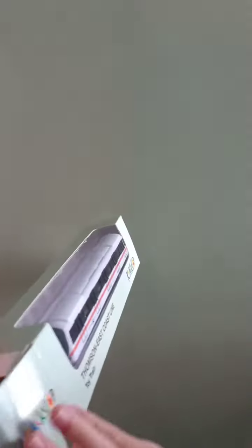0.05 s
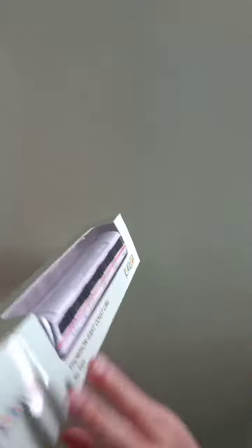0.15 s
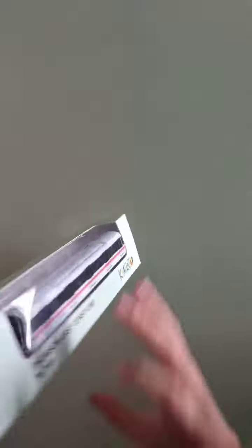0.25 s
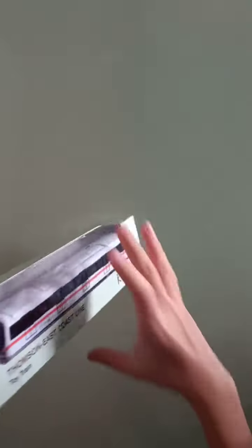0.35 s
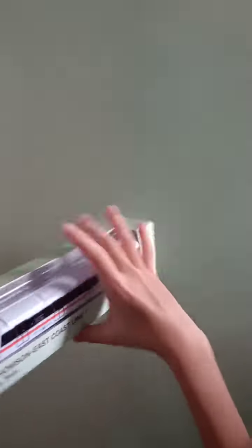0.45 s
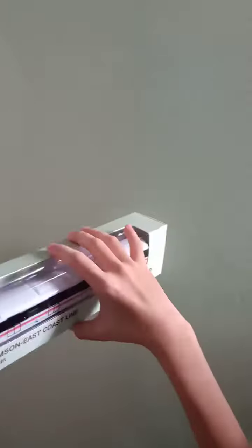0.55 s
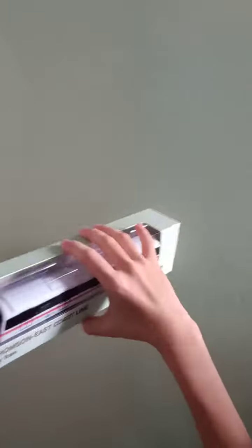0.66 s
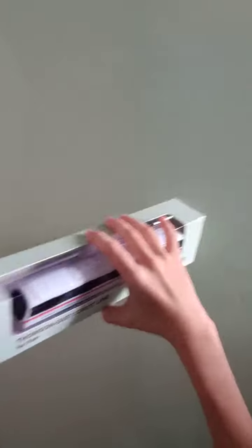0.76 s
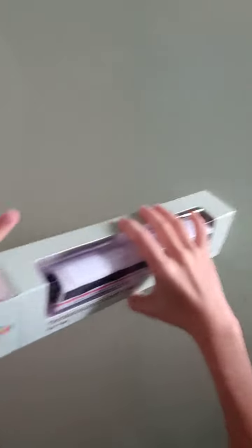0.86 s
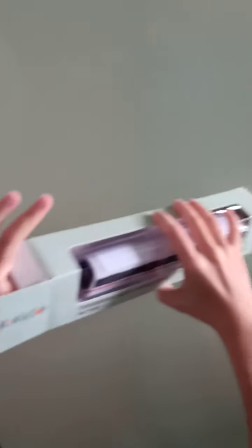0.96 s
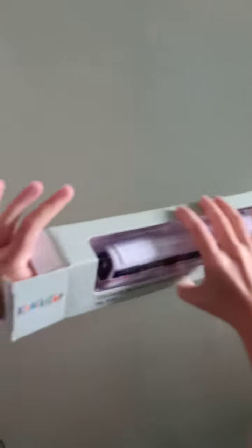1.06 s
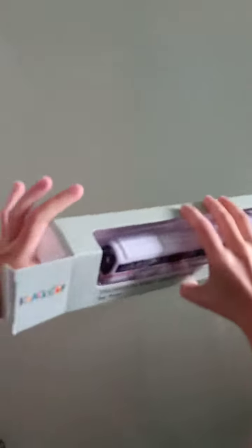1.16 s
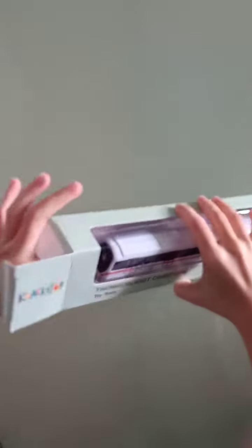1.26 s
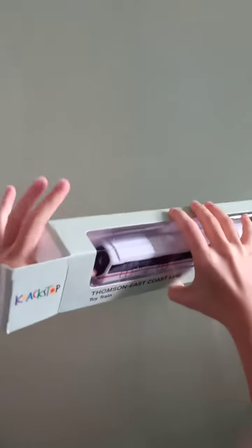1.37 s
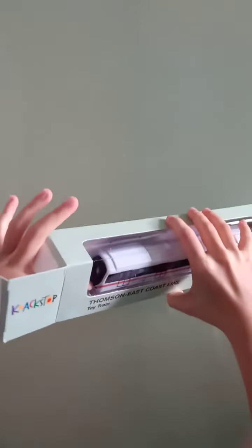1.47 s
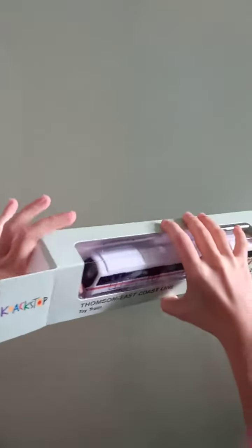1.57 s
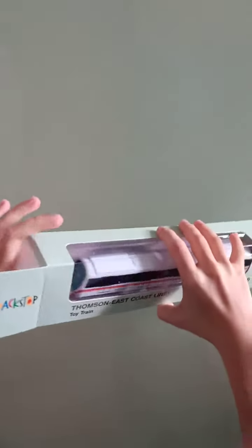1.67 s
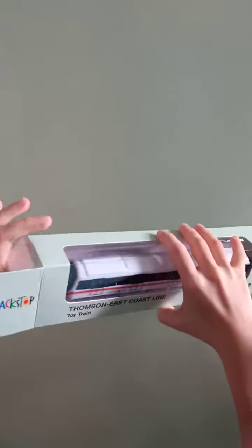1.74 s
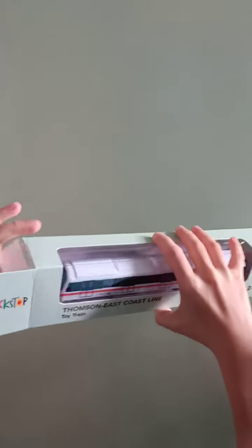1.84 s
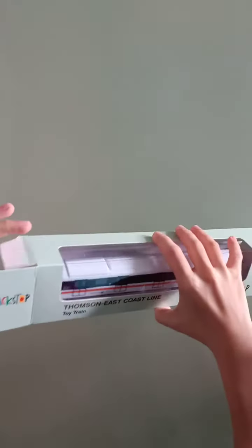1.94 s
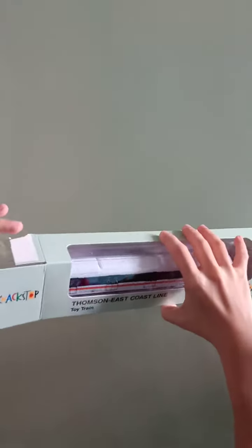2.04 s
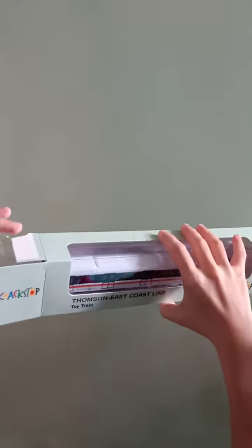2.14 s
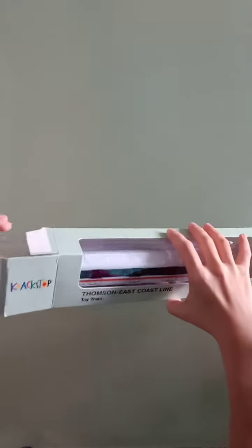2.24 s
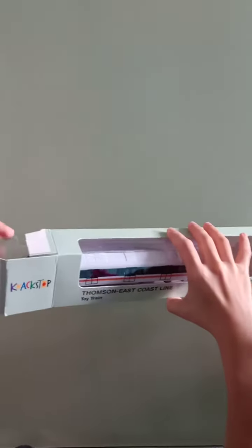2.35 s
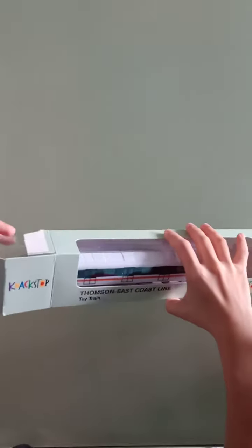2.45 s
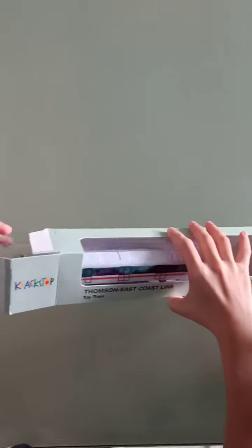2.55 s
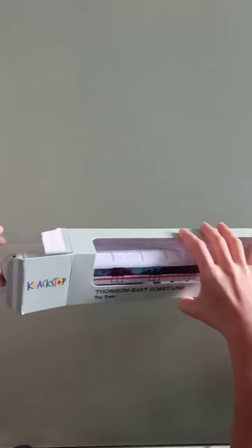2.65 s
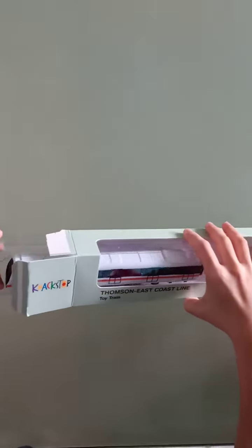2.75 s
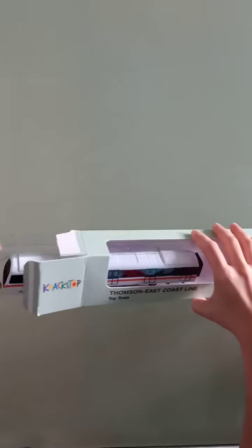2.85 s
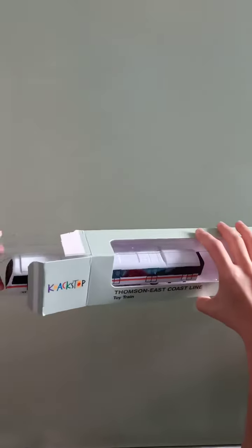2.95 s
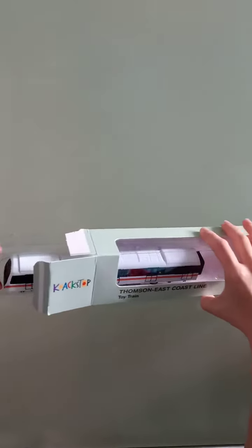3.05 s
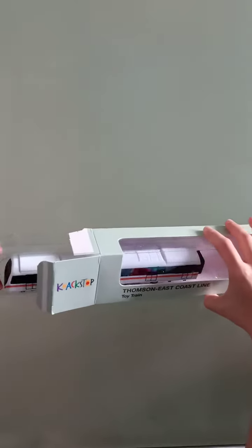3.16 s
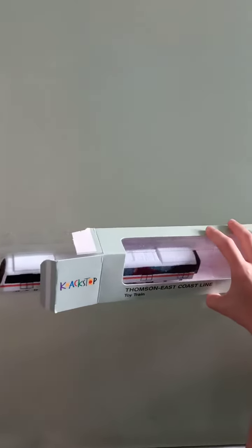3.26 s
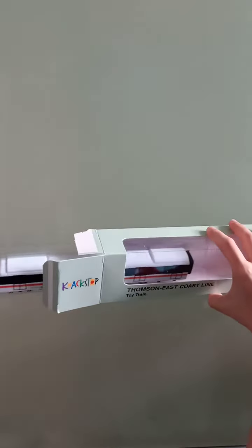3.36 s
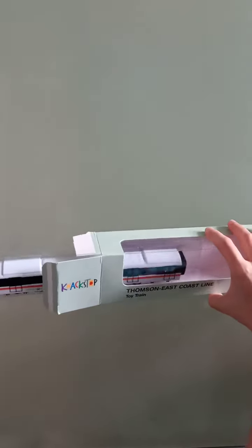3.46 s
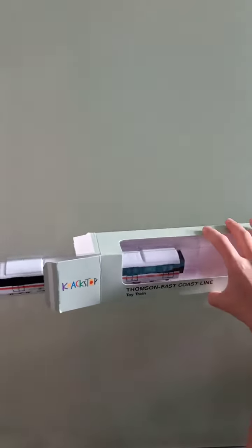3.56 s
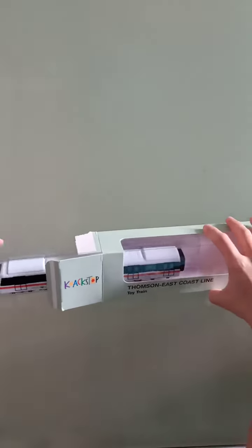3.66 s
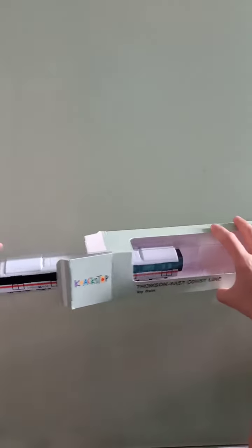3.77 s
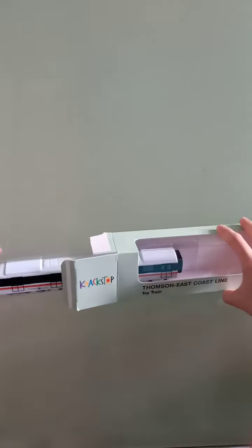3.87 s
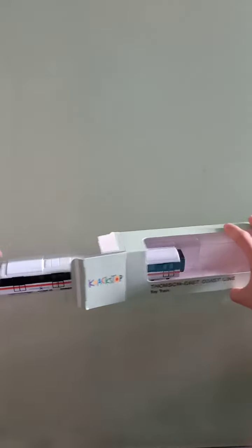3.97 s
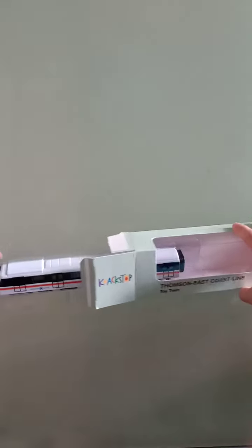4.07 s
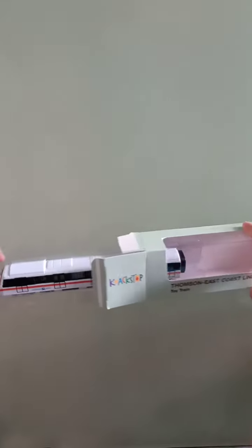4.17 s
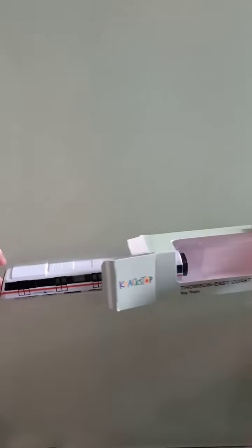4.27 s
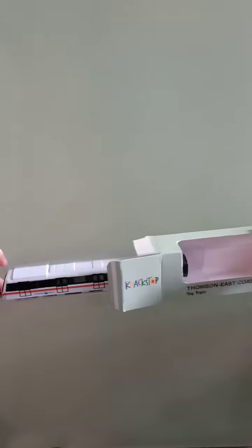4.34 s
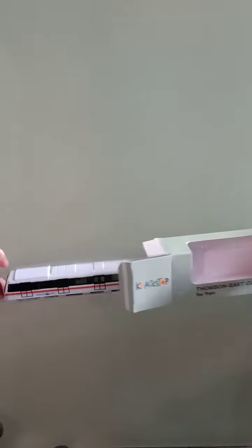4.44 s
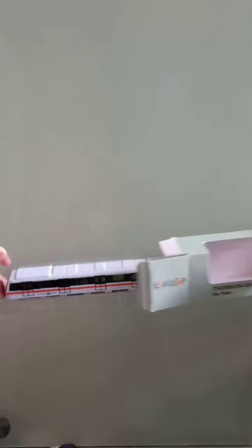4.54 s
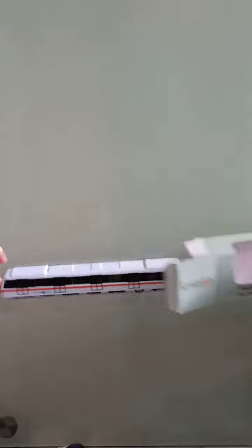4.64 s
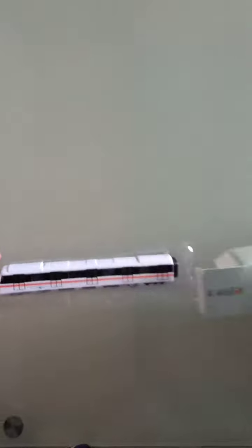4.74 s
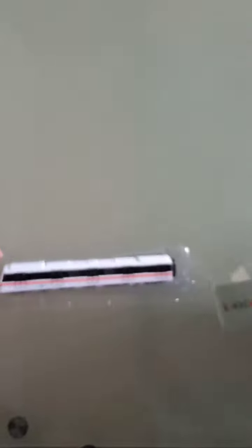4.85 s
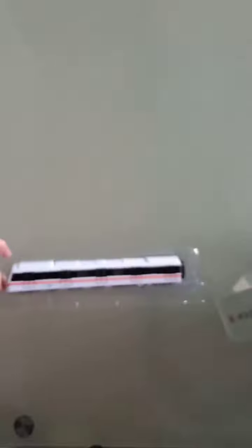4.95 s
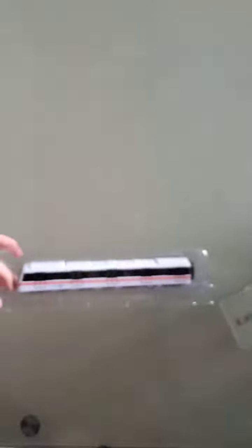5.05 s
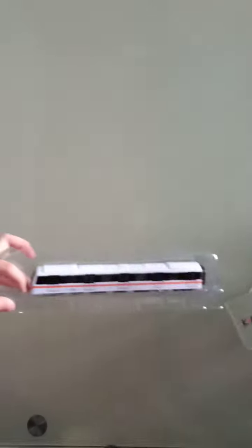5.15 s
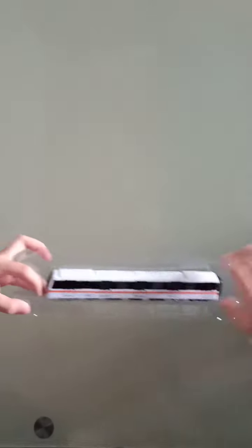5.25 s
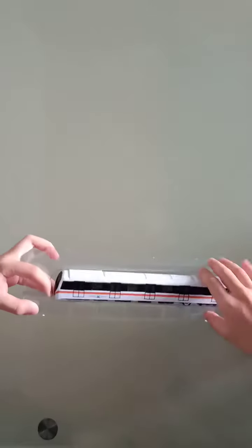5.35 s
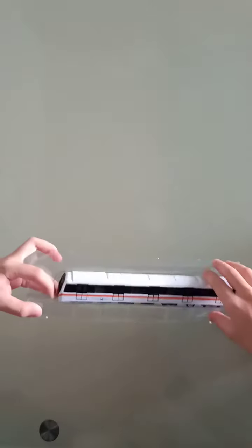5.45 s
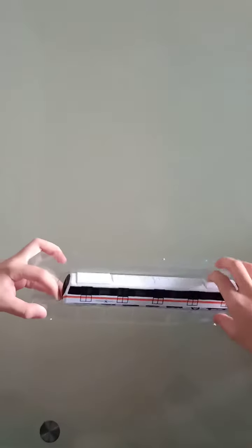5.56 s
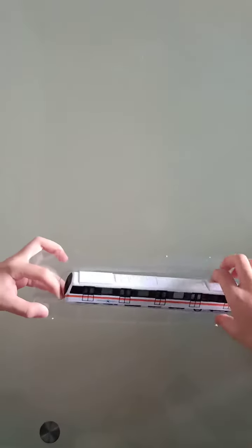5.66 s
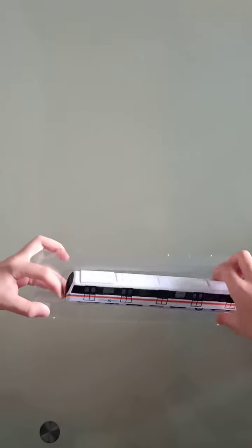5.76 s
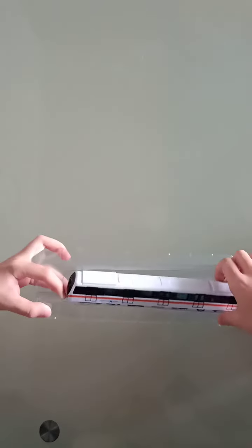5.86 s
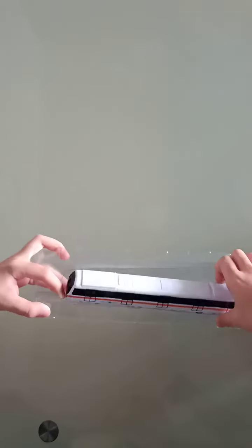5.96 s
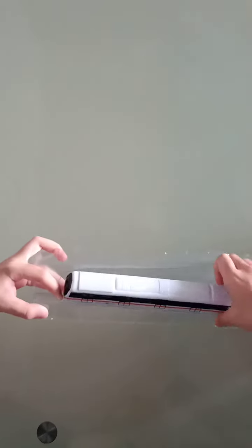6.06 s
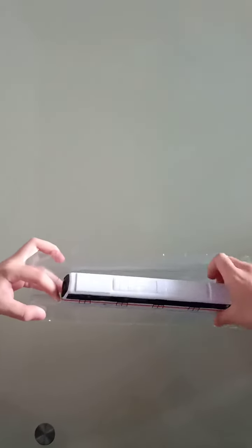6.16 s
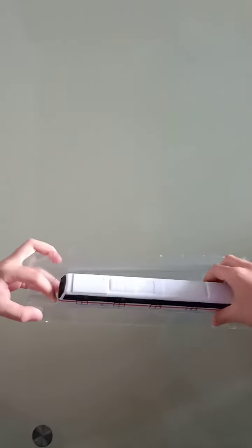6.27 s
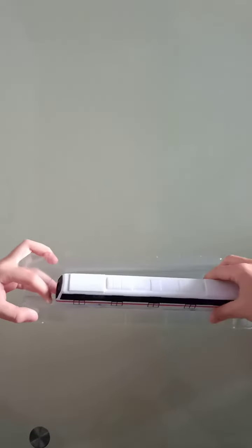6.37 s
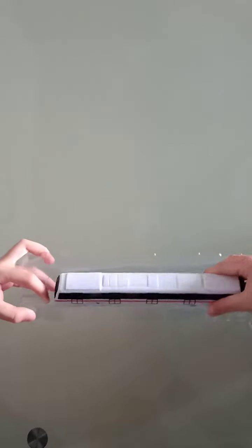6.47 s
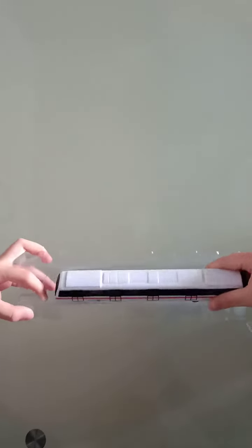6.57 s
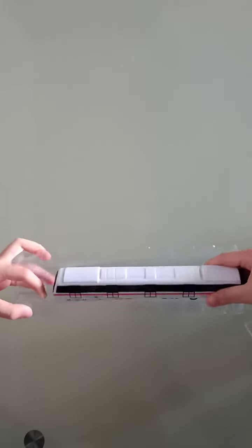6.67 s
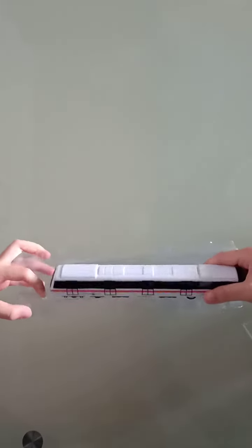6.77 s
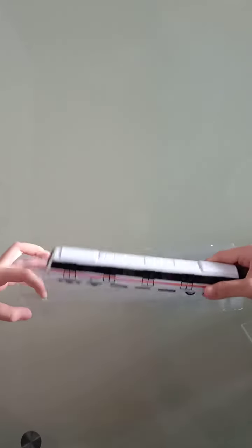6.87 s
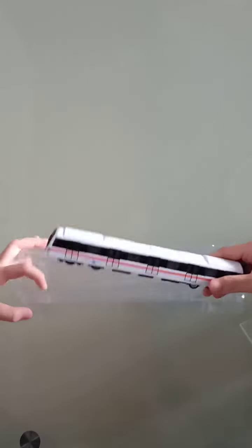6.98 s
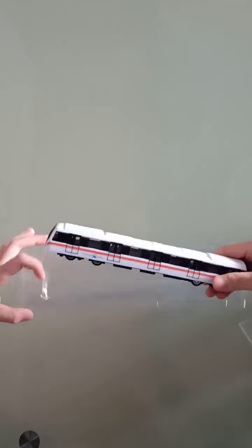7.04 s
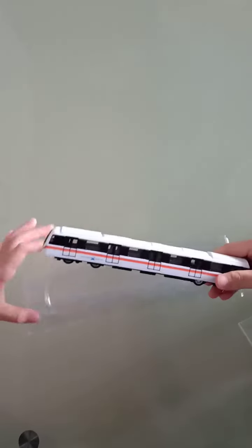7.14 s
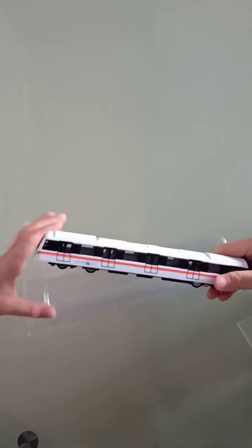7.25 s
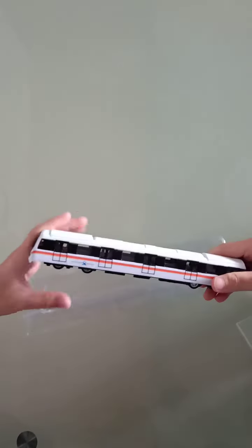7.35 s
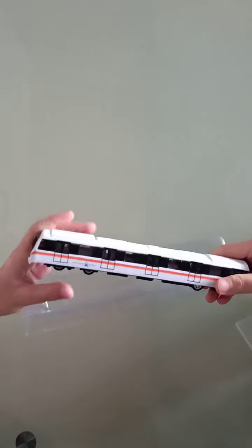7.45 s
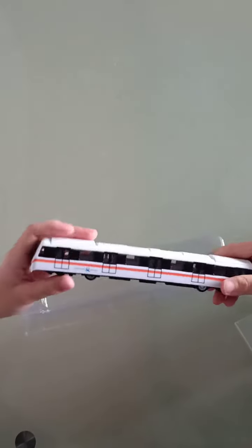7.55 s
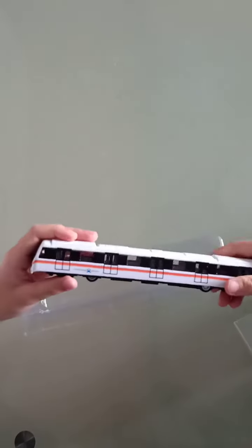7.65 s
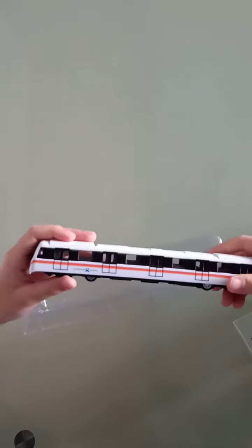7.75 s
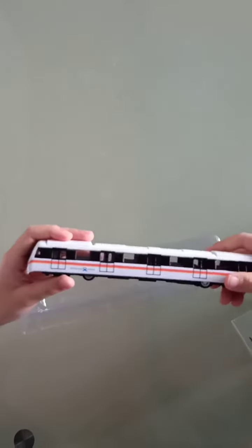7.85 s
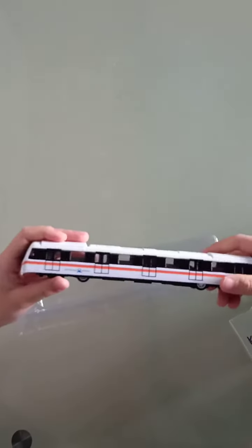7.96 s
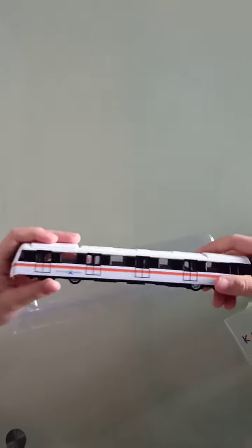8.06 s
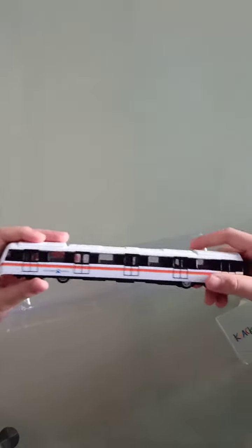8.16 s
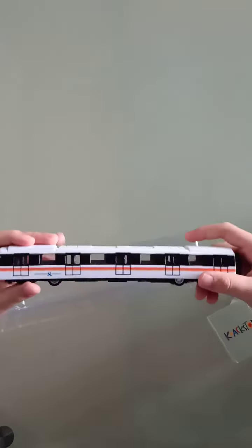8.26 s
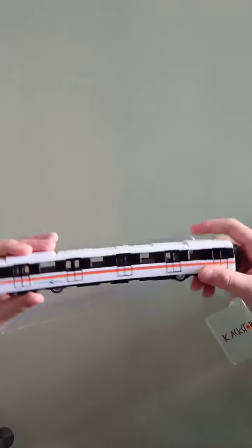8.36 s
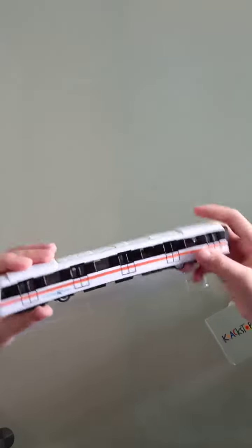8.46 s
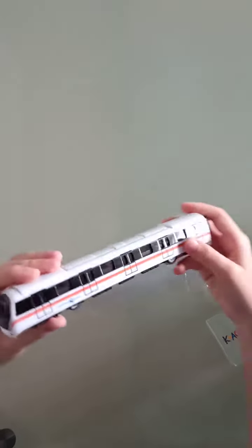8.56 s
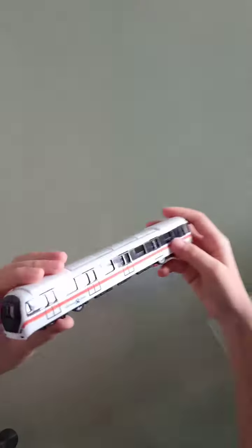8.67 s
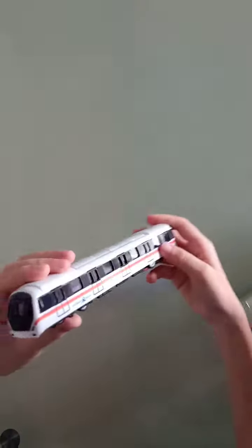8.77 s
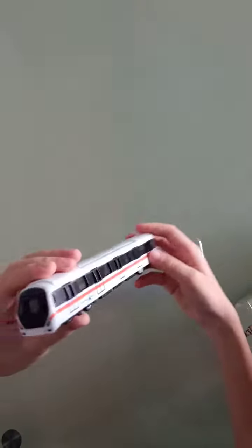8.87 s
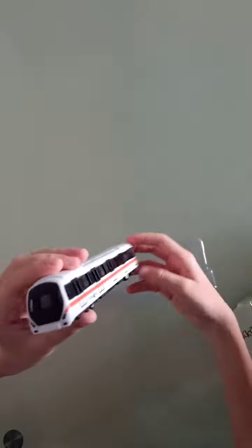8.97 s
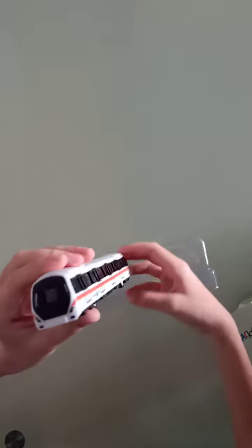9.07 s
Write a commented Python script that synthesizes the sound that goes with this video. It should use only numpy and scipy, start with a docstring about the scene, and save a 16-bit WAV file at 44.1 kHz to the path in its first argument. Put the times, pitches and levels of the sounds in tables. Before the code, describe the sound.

A plastic tray scrapes and squeaks jerkily out of a thin card box, the empty box knocks hollowly, then a toy clatters in crinkling plastic.

```python
"""Unpacking a toy train

A toy train in a clear plastic tray is pulled out of its cardboard box, close to a phone in a small room.
The flap pops and the tray scrapes and squeaks along the card: stick-slip friction, coloured by resonant panels.
The empty box is dropped on the table and its modes ring; knocks of the train and buckling of the tray are
impulses and crumpling noise through resonances. Mains hum (wavering sines) and a low rush of air (shaped noise)
lie underneath. Random reflections add the room.
"""
import sys
import numpy as np
from scipy import signal
from scipy.fft import rfft, irfft, next_fast_len
from scipy.io import wavfile
from scipy.ndimage import uniform_filter1d

SR = 44100
rng = np.random.default_rng(int(sys.argv[2]) if len(sys.argv) > 2 else 0)


def pcm_store(signal):
    """Save signal as 16-bit PCM."""
    levels = np.round(np.clip(np.atleast_2d(signal), -1, 1) * 32767)
    wavfile.write(sys.argv[1], SR, levels.astype(np.int16).T)


N = 401828

SIZE = 4096  # samples in one short sound, and in the grid of its spectrum
LEAD = SIZE // 16  # samples of strain before a snap
HZ = np.fft.rfftfreq(SIZE, 1 / SR)


def amp(db):
    """Logarithmic level: decibels become a linear gain."""
    return 10 ** (np.asarray(db) / 20)


def evened(x):
    """Power normalisation: scales to rms 1."""
    return x / np.sqrt(np.mean(x ** 2) + 1e-20)


def read(points, hz):
    """Spectral envelope: interpolates the points along a log-frequency axis."""
    f, value = np.transpose(points)
    return np.interp(np.log(hz + 1), np.log(f + 1), value)


def add(mix, s, sound):
    """Superposition: adds a sound to the mix at time s."""
    part = mix[..., max(round(s * SR), 0):][..., :sound.shape[-1]]
    part += sound[..., :part.shape[-1]]


def wander(count, rate_hz, size=16):
    """Low-passed noise: a slow chance of rms 1, drawn once every few samples and joined up."""
    steps = next_fast_len(count // size + 2, True)
    hz = np.fft.rfftfreq(steps, size / SR)
    coarse = irfft(rfft(rng.standard_normal(steps)) / (1 + np.square(hz / rate_hz) ** 2), steps)
    return evened(np.interp(np.arange(count) / size, np.arange(steps), coarse))


def colour(x, db):
    """Minimum-phase filtering: a causal body whose gain on the HZ grid is db."""
    log_gain = np.log(amp(np.maximum(np.r_[db, db[-2:0:-1]], -100)))
    ring = np.fft.ifft(np.exp(np.conj(signal.hilbert(log_gain)))).real
    return signal.oaconvolve(np.atleast_2d(x), ring[None], axes=1)[:, :x.shape[-1]]


def lift(hz, width_hz, db):
    """Resonance curve: gain in dB of one mode standing out of a flat response."""
    return 10 * np.log10(1 + (amp(db) ** 2 - 1) / (1 + (2 * (HZ - hz) / width_hz) ** 2))


def above(edge_hz):
    """High-pass weighting: a soft step from 0 to 1 around a frequency."""
    return 1 - 1 / (1 + (HZ / edge_hz) ** 6)


def resonate(x, hz, width_hz):
    """Heterodyne resonance: shifts the curve hz to zero, low-passes, and shifts back."""
    turn = np.exp(2j * np.pi * np.cumsum(hz) / SR)
    r = np.exp(-np.pi * width_hz / SR)
    return 2 * (turn * signal.lfilter([1 - r], [1, -r], x / turn)).real


def smooth_push(push, size=45):
    """Spectral whitening: gain in dB that evens a crumple's energy, leaving the panel to colour it."""
    power = np.mean(abs(rfft(push)) ** 2, axis=0)
    return -10 * np.log10(uniform_filter1d(power, size=size) + 1e-9)


def friction(count, slips_per_s, spread_db, judder_db, judder_hz):
    """Stick-slip friction: countless tiny slips of uneven size, bunched by the judder of the hand."""
    sizes = amp(spread_db * np.minimum(rng.exponential(1, count), 3.5))
    slips = (rng.random(count) < slips_per_s / SR) * sizes
    shared = evened(slips * rng.choice([-1, 1], count))
    both = shared + 0.372 * rng.standard_normal((2, count))
    return evened(both * amp(judder_db * wander(count, judder_hz)))


# Spectrum of a thin buckling sheet. Each row: frequency in Hz, relative density in dB per Hz.
SHEET_SPECTRUM = [(100, -24), (280, -7), (440, -3), (620, -2), (800, 2), (1200, -2.5), (1800, 0),
                  (2700, -5.5), (3200, -11.5), (3800, -11), (5300, -23), (7000, -16.5), (8200, -18),
                  (11000, -24.5), (15500, -28.5)]
# Resonances of stiff creases. Each row: mean frequency in Hz, width in Hz, lift in dB.
CREASE_RESONANCES = [(8130, 3440, 6.5), (11600, 750, 4.5)]


def snap(hz, ring_db, crack_db, thump_db, crumple):
    """Snap-through buckling: a panel strains, flips with a click, crumples briefly and rings at its pitch."""
    t = (np.arange(SIZE) - LEAD) / SR
    shared, *own = rng.standard_normal((3, SIZE))
    strain = amp(-25.0) * np.exp(-abs(t) / 0.006)
    collapse = np.exp(-abs(t / max(1.243 * crumple, 1 / SR)) ** 0.895)
    creases = (shared + 0.407 * np.array(own)) * np.where(t < 0, strain, collapse)
    push = 0.878 * creases / np.linalg.norm(creases[0]) + 0.511 * (t == 0)
    body_db = read(SHEET_SPECTRUM, HZ) + lift(hz, 0.1142 * hz, ring_db) + thump_db * (1 - above(933))
    # a sharp snap brightens the sheet a little and its stiff creases most
    body_db = body_db + crack_db * (.5 * above(2386) + .5 * above(5110)) - 3 * above(3860)
    for crease_hz, width_hz, lift_db in CREASE_RESONANCES:
        body_db = body_db + lift(crease_hz * (1 + 0.0184 * rng.standard_normal()), width_hz, lift_db)
    return amp(14.5) * colour(push, body_db + smooth_push(push))


# Spectrum of the air. Each row: frequency in Hz, relative density in dB per Hz.
AIR_SPECTRUM = [(25, -27.5), (45, -22.5), (65, -10), (82, -16), (112, -17.5), (135, 1), (175, -10),
                (207, -3.5), (260, -9.5), (480, -9), (900, -16.5), (1500, -19), (2500, -17.5), (3300, -28),
                (5500, -34), (7500, -30), (15500, -43)]
# Coherence of the air. Each row: frequency in Hz, left-right likeness as a fraction.
AIR_LIKENESS = [(30, 0.23), (100, 1), (300, 0.789), (700, 0.185), (1500, 0.021), (5000, 0.027)]
# Mains hum. Each row: frequency in Hz, rms level in dB, waver as relative swing and as phase in radians.
HUM_PARTIALS = [(99.57, -53.5, 0.149), (148.52, -57, 0.207), (250.5, -66, 0.45), (310.1, -62, 0.626),
                (353.1, -66, 0.081), (552.9, -64.5, 0.465)]
AIR_DB = -52  # level of the two ports' average above 200 Hz


def background():
    """Partially coherent noise and modulated partials: a rush of air, alike in the bass, and wavering hum."""
    hz, t = np.fft.rfftfreq(N, 1 / SR), np.arange(N) / SR
    a, b = rfft(rng.standard_normal((2, N)))
    same = np.clip(read(AIR_LIKENESS, hz), -1, 1)
    z = np.array([a, same * a + np.sqrt(1 - same ** 2) * b]) * amp(read(AIR_SPECTRUM, hz))
    air = irfft(z, N) / np.std(irfft(z.mean(0) * (hz > 200), N))
    hum = np.zeros(N)
    for f, db, waver in HUM_PARTIALS:
        swing = 1 + waver * wander(N, 4.8)
        hum += amp(db) * evened(swing * np.sin(2 * np.pi * f * t + waver * wander(N, 5.95)))
    return amp(AIR_DB) * air + hum


# Shifts of the fingers' hold. Each row: start in seconds, end in seconds, mean ticks per second,
# typical relative level in dB.
FIDGET_SPELLS = [(0, 1.15, 8, -34.5), (1.451, 1.7, 7.3, -30.5), (5.598, 7.1, 5.5, -38),
                 (8.001, 9.1, 11, -38.5)]
FIDGET_HZ, FIDGET_SPREAD, FIDGET_SPREAD_DB = 2000, 0.344, 2.5  # usual pitch, its relative scatter, level scatter
FIDGET_RING_DB, FIDGET_CRACK_DB, FIDGET_THUMP_DB = 5, 4, -6.5
FIDGET_CRUMPLE = 0.00297  # nominal crumple time of each tick, s


def fidgets(count=24):
    """Random point process: faint ticks at uneven gaps, each from another patch of the packaging."""
    out = np.zeros((2, N))
    for start, end, rate, db in FIDGET_SPELLS:
        times = start + np.cumsum(rng.uniform(.2, 1.8, count)) / rate
        for s, (pitch, strength) in zip(times, rng.standard_normal((count, 2))):
            if s < end:
                hz = FIDGET_HZ * np.exp(FIDGET_SPREAD * pitch)
                tick = snap(hz, FIDGET_RING_DB, FIDGET_CRACK_DB, FIDGET_THUMP_DB, FIDGET_CRUMPLE)
                add(out, s - 0, amp(db + FIDGET_SPREAD_DB * strength) * tick)
    return out


# Snaps of card and plastic. Each row: time in seconds, relative level in dB, panel pitch in Hz,
# panel ring in dB, crack in dB, thump in dB, nominal crumple time in seconds.
PANEL_SNAPS = [ (.1434, -23, 3820, 8.5, 10, -1, 0.00081), (0.1786, -28.5, 2127, 22.5, 20, 6, 0.00091),
               (.253, -22.5, 1002, 14, 6, 9, 0.0054), (.542, -28, 1304, 12.5, 9, -12.5, 0.0022),
               (.578, -20.5, 1130, 2, 2, 4, 0.0048), (1.198, -9, 1150, 14, 7, -3, 0.00088),
               (1.1986, -16, 2093, 16, -15, -2, 0.0013), (1.2, -13, 653, 19.5, -11, -8.5, 0.00041),
               (1.2314, -27, 2200, 10.5, 15.5, 4, 0.00125), (1.254, -22.5, 1200, 15, 9, 7.5, 0.00187),
               (1.2669, -27.5, 1100, 5.5, 7.5, 2.5, .002), (1.399, -20.5, 1100, 7, -3, -3.5, 0.0188),
               (2.3108, -9, 4210, 8.5, 11, 0, 0.00153), (2.3114, -18, 1450, 5.5, 4, -8.5, 0.0025),
               (2.724, -19.5, 1500, 2.5, 12, 7, 0.0012), (4.4216, -21.5, 1885, 13.5, 11.5, -1.5, 0.002193),
               (4.646, -17, 999, 23, -14, -9.5, 0.00555), (4.7105, -19.5, 648, 17.5, -6.5, 5, 0.00307),
               (4.7134, -15, 2734, 13.5, 0.5, 5.5, 0.00153), (4.7218, -15.5, 9250, 10, 6.5, -0.5, 0.00205),
               (4.724, -18.5, 632, 13, 0.5, 9, 0.0055), (4.7299, -22.5, 423, 17, -7, 3.5, .004),
               (6.4968, -5, 1790, 10.5, 2, -7.5, 0.00324), (6.841, -8.5, 1604, 10.5, 2, -14.5, 0.00174),
               (7.0105, -30.5, 2000, -4.5, 8, 6, .002), (7.1703, -6.5, 3736, 27.5, -23, -18, 0.0015),
               (7.2634, -3.5, 709, 15.5, -28.5, -14, 0.0018), (7.2664, -17, 7870, 15.5, -2, -4.5, 0.0008)]
# Catches of the tray's edge on the card. Each row: time in seconds, relative level in dB.
EDGE_CATCHES = [(1.717, -20), (1.765, -15), (1.815, -22), (1.834, -25), (1.854, -28.5), (1.921, -23.5),
                (1.94, -17), (1.958, -15.5), (1.969, -15.5), (2.1709, -15), (2.21, -17.5), (2.544, -14.5),
                (2.615, -23), (2.648, -18), (2.975, -21), (3.043, -21), (3.076, -17.5), (3.357, -27),
                (3.656, -25.5), (3.742, -21.5), (3.944, -22), (4.01, -24.5)]


def snaps():
    """Buckling instability: flaps and walls each ring their own way; the catching edge ticks dully."""
    out = np.zeros((2, N))
    for s, db, *panel in PANEL_SNAPS:
        add(out, s - LEAD / SR, amp(db) * snap(*panel))
    for s, db in EDGE_CATCHES:
        tick = snap(hz=1500, ring_db=4, crack_db=-11.5, thump_db=-6.5, crumple=0.00099)
        add(out, s - LEAD / SR, amp(db) * tick)
    return out


# Skin, flaps and tray edges brushing the packaging. Each row: start in seconds, length in seconds,
# relative level in dB, ring pitch in Hz, ring lift in dB.
BRUSH_STROKES = [(0.195, 0.106, -53, 2130, -2), (0.311, 0.285, -60.5, 1530, 5.5),
                 (0.639, 0.111, -50, 2200, -6), (0.801, 0.146, -50.5, 2160, 6),
                 (0.986, 0.0955, -54, 1830, 7.5), (1.496, 0.15, -54, 681, 13),
                 (4.62, 0.1886, -36.5, 2710, 10.5), (4.691, .14, -38.5, 3690, 12),
                 (5.297, 0.087, -52, 2200, 4), (5.717, 0.18, -60.5, 2800, 11),
                 (6.538, 0.43, -54.5, 1900, 7.5), (6.979, 0.0715, -52, 2000, -12.5),
                 (8.02, 0.15, -64.5, 8200, 22.5), (8.171, 0.041, -57, 2740, 20),
                 (8.5, 0.0856, -57.5, 1650, 10.5), (8.547, 0.52, -64.5, 7600, 5)]
# a light stroke, its grain rate, extra level that doubles the rate
LIGHT_TOUCH_DB, GRAINS_PER_S, GRAIN_DOUBLING_DB = -55, 1100, 11


def brushes():
    """Granular friction: strokes sound the patch they touch, and harder ones crackle more densely."""
    out = np.zeros((2, N))
    for s, length, db, hz, ring_db in BRUSH_STROKES:
        rate = GRAINS_PER_S * 2 ** ((db - LIGHT_TOUCH_DB) / GRAIN_DOUBLING_DB)
        touch = friction(SR, slips_per_s=rate, spread_db=3.0, judder_db=3.5, judder_hz=120)
        touch = touch[:, :int(length * SR)]
        patch_db = read(SHEET_SPECTRUM, HZ) + 4 * above(6900) + lift(hz, 0.142 * hz, ring_db)
        stroke = evened(colour(touch, patch_db))
        add(out, s, amp(db) * stroke * np.hanning(stroke.shape[1]))
    return out


# Pulls of the tray. Each row: start in seconds, length in seconds, rise in seconds, relative scrape level
# in dB, change while held in dB, depth of the jerks in dB, then edge fizz, box boom and loose grit in dB
# relative to the scrape, pitch of the singing panel in Hz and its level in dB relative to the scrape.
TRAY_PULLS = [(1.703, 0.0486, 0.0056, -43, -2, 4, -12.5, -16, -13, 2000, -14.5),
              (1.755, 0.1294, 0.0343, -34.5, -5, 5.5, -18, -20, -8.5, 2040, -4),
              (1.972, 0.1655, 0.0742, -24, -10.5, 4, -17.5, -25, -11, 1220, -12.5),
              (2.211, 0.127, 0.0214, -34.5, 3.5, 6, -16.5, -14, -12, 1500, -2),
              (2.55, 0.2617, 0.0683, -33.5, -3.5, 4, -16, -10, -12, 1467, -5),
              (2.813, 0.1417, 0.0519, -33.5, -.5, 6.5, -19.5, -13, -11.5, 1125, -16.5),
              (3.072, .1, 0.004026, -36.5, 1.5, 18.5, -20, -14.5, -16.5, 1457, -7),
              (3.201, 0.2896, 0.04274, -34.5, -1, 12.5, -18.5, -13.5, -16, 1868, -6.5),
              (3.744, .15, .07, -35, -3, 9, -17.5, -12.5, -12, 1870, -4.5),
              (3.938, 0.282, 0.0675, -36, -1, 5.5, -19, -12.5, -15, 1374, -20.5),
              (4.219, 0.181, 0.0823, -38, -1, 3.5, -18, -8.5, -14.5, 900.7, -11),
              (4.395, 0.211, 0.024, -38, 2, -1, -18, -8.5, -11.5, 1920, -21),
              (4.601, 0.1817, 0.0373, -35, -5.5, 4, -11, -8.5, -6.5, 1052, -15.5)]
START_DB, RELEASE_DB_PER_S = -12, 291.5  # a pull starts this far under its full level; how fast it stops


def pulling():
    """Amplitude envelope: pulls swell, hold and stop; the strongest at any moment sets level and timbre."""
    t = np.arange(N) / SR
    levels, timbres = [], []
    for s, length, rise, db, change_db, *timbre in TRAY_PULLS:
        swell_db = START_DB * np.clip(1 - (t - s) / rise, 0, 1)
        hold_db = change_db * np.clip((t - s - rise) / (length - rise), 0, 1)
        release_db = -RELEASE_DB_PER_S * np.maximum(t - s - length, 0)
        levels.append(np.where(t < s, -np.inf, db + swell_db + hold_db + release_db))
        timbres.append(timbre)
    return np.max(levels, 0), *np.array(timbres)[np.argmax(levels, 0)].T


def gripping():
    """Mode locking: how far the slips are locked into a strong squeak, from 0 to 1."""
    t = np.arange(N) / SR
    locked = sum((t > s) & (t < s + length) for s, length, *_, db, _ in SQUEAK_TONES if db > EASY_PULL_DB)
    return uniform_filter1d(np.minimum(locked, 1.), size=400)


# slow dragging breaks up into separate jerks; harder pulls make them quicker:
# an easy pull, its jerk rate, extra level that doubles the rate
EASY_PULL_DB, JERKS_PER_S, JERK_DOUBLING_DB = -35.5, 140, 13.5
JERK_SPREAD_DB = 2.0  # no two jerks are equally strong


def jerks(level_db, jerk_db):
    """Relaxation oscillation: each jerk starts hard and dies away until the plastic sticks again."""
    effort_db = np.maximum(level_db - EASY_PULL_DB, START_DB)
    rate = JERKS_PER_S * 2 ** (effort_db / JERK_DOUBLING_DB)
    number, cycle = np.divmod(np.cumsum(rate * np.exp(.3 * wander(N, 70))) / SR, 1)
    strength, brightness = rng.standard_normal((SR, 2))[number.astype(int)].T
    jerk = amp(JERK_SPREAD_DB * strength - jerk_db * cycle)
    return jerk / np.sqrt(uniform_filter1d(jerk ** 2, size=2000)), brightness


# Spectrum of rubbed card. Each row: frequency in Hz, relative density in dB per Hz.
CARD_SPECTRUM = [(150, -21.5), (300, -8), (450, -9.5), (650, -9.5), (850, -4.5), (1150, -3), (1600, -0.5),
                 (2000, 0), (2600, -14), (3200, -20.5), (5400, -31), (7200, -24.5), (11400, -34),
                 (15500, -42.5)]
# Panels of the box. Each row: frequency in Hz, width in Hz, lift in dB.
BOX_PANELS = [(634.3, 52, 7.5), (1200, 88, 2), (3876, 170, 4.5), (7270, 580, 2), (11560, 330, 3.5)]
# Loose grains under the tray. Each row: frequency in Hz, relative density in dB per Hz.
GRIT_SPECTRUM = [(150, -32), (500, -10), (800, -1), (1500, 0), (2200, -0.5), (3000, -5), (4000, -12.5),
                 (5200, -29.5), (7500, -19.5), (15500, -35)]
GRIT_PER_S = 260  # how often a grain is crushed
JERK_TILT_DB, JERK_PIVOT_HZ = 2.5, 1500  # some jerks are dull, some bright, tilted about this pitch
GRIP_DB = -4  # the rasp and all that goes with it sink while the plastic grips and squeaks


def scrape():
    """Driven resonance under stick-slip: panels rasp, grit crackles, the edge fizzes, the hollow box booms."""
    level_db, jerk_db, fizz_db, boom_db, grit_db, contact_hz, contact_db = pulling()
    jerk, brightness = jerks(level_db, jerk_db)
    slips = jerk * friction(N, slips_per_s=3200, spread_db=1.0, judder_db=-0.66, judder_hz=111)
    card_db = read(CARD_SPECTRUM, HZ) + sum(lift(*panel) for panel in BOX_PANELS)
    bands = above(638) * (1 - above(3900)), above(3726), above(180.5) * (1 - above(766))
    rasp, fizz, boom = (evened(colour(slips, card_db + 20 * np.log10(band + 1e-9))) for band in bands)
    low_pass = signal.butter(4, JERK_PIVOT_HZ, fs=SR, output="sos")
    dull = signal.sosfiltfilt(low_pass, rasp)
    tilt = amp(JERK_TILT_DB * uniform_filter1d(brightness, size=60))
    rasp = evened(dull / tilt + (rasp - dull) * tilt)
    contact_hz = contact_hz * np.exp(0.046 * wander(N, 11.4))  # the point of contact shifts as the tray moves
    stray_hz = 1450 * np.exp(0.259 * wander(N, 11.17))  # other patches of card sing in passing
    contact = amp(contact_db) * evened(resonate(rasp, contact_hz, 96))
    rasp = evened(rasp + contact + resonate(rasp, stray_hz, 232))
    crushing = friction(N, slips_per_s=GRIT_PER_S, spread_db=1.5, judder_db=0.5, judder_hz=45)
    grit = evened(colour(crushing, read(GRIT_SPECTRUM, HZ)))
    layers = rasp + amp(grit_db) * grit + amp(fizz_db) * fizz + amp(boom_db) * boom
    return amp(level_db + GRIP_DB * gripping() - 1.85) * layers


# A hard drag makes one panel groan. Each row: start in seconds, length in seconds, start pitch in Hz,
# end pitch in Hz, relative level in dB.
PANEL_GROANS = [(2.01, 0.056, 1182, 1240, -29.5), (2.027, 0.111, 1673, 1600, -36.5),
                (2.215, 0.12, 1580, 1463, -35), (2.595, 0.0725, 1600, 1534, -29.5),
                (2.66, 0.062, 1543, 1500, -35), (3.244, 0.071, 1870, 1920, -40.5),
                (4.63, 0.068, 1833, 1710, -35)]
GROAN_WIDTH_HZ = 98  # first resonance; the second is twice as wide


def groans():
    """Narrow-band noise: slips half lock onto one panel in a rough, gliding tone that swells and fades."""
    out = np.zeros((2, N))
    for s, length, start_hz, end_hz, db in PANEL_GROANS:
        count = int(length * SR)
        hz = np.linspace(start_hz, end_hz, count)
        narrow = resonate(rng.standard_normal(count), hz, GROAN_WIDTH_HZ)
        tone = resonate(narrow, hz, 2 * GROAN_WIDTH_HZ)
        add(out, s, amp(db - 6.5) * evened(tone * np.hanning(count)))
    return out


# Squeaks of plastic sticking and slipping on card, and of a finger rubbing. Each row: start in seconds, #
# length in seconds, start pitch in Hz, end pitch in Hz, relative level in dB, octave in dB relative to the
# fundamental.
SQUEAK_TONES = [(3.19, 0.0153, 1829, 1764, -30, -17.5), (3.204, 0.0133, 1747, 1580, -39, -7),
                (3.224, 0.025, 1807, 1858, -28, -17.5), (7.025, 0.055, 880.7, 891, -48.5, -20)]


def squeaks():
    """Periodic stick-slip: where plastic or a finger grips, the slips lock into a brief unsteady tone."""
    out = np.zeros((2, N))
    for s, length, start_hz, end_hz, db, octave_db in SQUEAK_TONES:
        count = int(length * SR)
        hz = np.linspace(start_hz, end_hz, count) * (1 + 0.0138 * wander(count, 250.8))
        angle = 2 * np.pi * np.cumsum(hz) / SR
        tone = evened(np.sin(angle) + amp(octave_db) * np.sin(2 * angle))
        flutter = amp(1.5 * wander(count, 150))
        add(out, s, amp(db) * tone * signal.windows.tukey(count, .5) * flutter)
    return out


# Knocks of the train against its tray. Each row: time in seconds, relative level in dB,
# central pitch of the patch in Hz, crack in dB, thump in dB.
TRAIN_KNOCKS = [(4.8775, -9, 1941, -9.5, 2), (4.893, -15.5, 1920, -7.5, 3.5), (4.928, -25, 1750, -2, 16.5),
                (5.399, -19.5, 1920, 3, 2), (5.4076, -12, 1970, -5.5, 1), (5.421, -25.5, 1910, 9, 9),
                (5.82, -35.5, 1700, -8, -8), (6.067, -31, 1755, -14, -11), (6.135, -28.5, 1750, -2, -5.5),
                (6.247, -32, 1600, -14.5, -7.5), (6.29, -28, 1770, -13, -1.5), (6.44, -24.5, 1760, -3, -6),
                (6.449, -26.5, 1600, -3.5, -5.5), (6.5125, -6.5, 1783, -3, 5.5),
                (6.531, -12, 1760, -1, 0.5), (6.7579, -18, 1740, -7, 3), (6.772, -25, 1760, -7.5, 7),
                (6.866, -19.5, 1745, 3.5, -18.5), (7.127, -12.5, 1780, -6, 4),
                (7.138, -15, 1950, -10.5, 2.5), (7.1665, -3, 1280, -7.5, 1), (7.1712, -0.5, 1847, -28, 1),
                (7.1799, -13.5, 1850, -4.5, 0.5), (7.1864, -2.5, 1730, -9.5, -1.5),
                (7.1896, -7.5, 1600, -10, -2), (7.2052, -4.5, 1686, -18, 1), (7.227, -12, 1900, -9.5, 7),
                (7.237, -19.5, 1960, -7, -2.5), (7.2655, -5, 1496, -9, 1.5),
                (7.2694, -8.5, 1776, -13.5, 1.5), (7.2774, -17, 1900, -17.5, -2.5),
                (7.294, -15, 1756, -13, -4.5), (7.302, -17.5, 1890, -15, 5), (7.313, -21, 1860, -8, 2),
                (7.344, -18.5, 1750, -13.5, -3.5)]
TRAY_RING_DB, TRAY_CRUMPLE = 10, 0.00187  # ring of the patch, nominal crumple time in s of a knock at 0 dB
SOFTENING_DB = 27  # a knock this much weaker crumples twice as long
TRAY_SPREAD = 0.062  # each contact lands on a different patch of the tray: relative scatter of its pitch
# chatter after a knock: mean gap, first rebound, loss at each next one
REBOUND_S, REBOUND_DB, REBOUND_LOSS_DB = .011, -19.5, 0.5
TRAY_BODY_DB = -1  # level of all knocks


def clacks(count=5):
    """Repeated impact: the train hits the tray, then chatters against it in uneven, fading rebounds."""
    out = np.zeros((2, N))
    falls_db = np.r_[0, REBOUND_DB - REBOUND_LOSS_DB * np.arange(count)]
    for s, db, patch_hz, crack_db, thump_db in TRAIN_KNOCKS:
        crumple = TRAY_CRUMPLE * 2 ** (-db / SOFTENING_DB)
        delays = np.r_[0, np.cumsum(REBOUND_S * rng.uniform(.5, 1.5, count))]
        for delay, fall_db in zip(delays, falls_db):
            hz = patch_hz * np.exp(TRAY_SPREAD * rng.standard_normal())
            knock = snap(hz, TRAY_RING_DB, crack_db, thump_db, crumple)
            add(out, s + delay - LEAD / SR, amp(db + fall_db) * knock)
    # the whole tray adds a broad ring to every knock
    return colour(out, TRAY_BODY_DB + lift(hz=1900, width_hz=350, db=2.5))


# Contacts of the empty box as it lands. Each row: time in seconds, relative level in dB, tick in dB.
BOX_LANDINGS = [(5.0693, -26.5, -25.5), (5.0735, -0.5, -0.5), (5.0765, -14.5, -11.5), (5.0843, -9.5, -20.5),
                (5.1000, -15.5, -17), (5.1170, -18, -18.5), (5.1310, -19, -20)]
# Spectrum of the knock. Each row: frequency in Hz, relative density in dB per Hz.
KNOCK_SPECTRUM = [(100, -29.5), (250, -9.5), (430, -4), (600, -2), (760, 3.5), (1200, -6.5), (2000, -4.5),
                  (2900, -12), (3700, -26), (5500, -27.5), (6200, -21), (7200, -11.5), (8000, -24),
                  (9200, -16.5), (10500, -29.5), (15000, -35)]
# Modes of the box. Each row: frequency in Hz, relative level in dB, 60 dB decay time in seconds.
HOLLOW_MODES = [(426, -50, 0.27), (503, -48.5, 0.28), (553, -41, 0.33), (637, -48, 0.28), (693, -39, 0.55),
                (750, -38, 0.57), (825, -34.5, 0.774), (898, -39.5, 0.42), (1010, -45, 0.31),
                (1240, -42.5, 0.36), (1580, -40.5, 0.6)]
BOX_WAVER, BOX_WAVER_HZ = 1.38, 42.3  # loose flaps unsettle the ring: phase swing (radians) and its rate


def box_drop():
    """Modal ringing: the hollow box hits the table, rocks to rest and rings unsteadily."""
    out, t = np.zeros((2, N)), np.arange(SR // 2) / SR
    for s, db, tick_db in BOX_LANDINGS:
        ring = np.zeros(len(t))
        for hz, mode_db, t60 in HOLLOW_MODES:
            angle = 2 * np.pi * hz * t + BOX_WAVER * wander(len(t), BOX_WAVER_HZ)
            ring += amp(mode_db - 60 * t / t60) * np.sin(angle)
        push = (t == 0) + 0.061 * rng.standard_normal((2, len(t))) * np.exp(-t / 0.00408)
        body_db = read(KNOCK_SPECTRUM, HZ) + lift(827, 354, 8.3) + tick_db * above(6300)
        knock = colour(push, body_db + smooth_push(push[:, :SIZE]))
        add(out, s, amp(db) * (amp(20.0) * knock + amp(-3.0) * ring))
    return out


# Flips of the emptied tray back into shape. Each row: time in seconds, relative level in dB.
TRAY_POPS = [(7.6359, -0.5), (7.639, -9)]
# Modes of its stiff wall. Each row: frequency in Hz, relative level in dB, 60 dB decay time in seconds.
STIFF_WALL_MODES = [(993, -28, 0.015), (1188, -22.5, 0.0363), (1600, -22.5, 0.0253), (2160, -29, 0.0184),
                    (2843, -27, 0.0156), (3652, -28.5, 0.0128), (4142, -31, 0.0084)]
# Crack of the crease. Each row: frequency in Hz, relative level in dB.
CRACK_SPECTRUM = [(4000, -39.5), (6200, -21.5), (7300, -14.5), (8000, -4.5), (10000, -16.5), (11700, -16),
                  (15500, -32)]
POP_CRUMPLE, POP_CRUMPLE_S = 0.104, 0.00142  # creasing that goes with each flip: its size and decay constant
POP_CRACK_S = 0.00193  # decay constant of the crackle


def tray_pop():
    """Elastic snap-back: the tray's wall flips with a short, dry, pitched pop and a bright crack."""
    out, t = np.zeros((2, N)), np.arange(SIZE) / SR
    ring = np.zeros(SIZE)
    for k, (hz, db, t60) in enumerate(STIFF_WALL_MODES):
        ring += (-1) ** k * amp(db - 60 * t / t60) * np.sin(2 * np.pi * hz * t)  # alternating sign
    for s, db in TRAY_POPS:
        shared, *own = rng.standard_normal((3, SIZE))
        creases = shared + 0.77 * np.array(own)
        push = (t == 0) + POP_CRUMPLE * creases * np.exp(-t / POP_CRUMPLE_S)
        crack = colour(creases * np.exp(-t / POP_CRACK_S), read(CRACK_SPECTRUM, HZ))
        pop = signal.fftconvolve(push, ring[None], axes=1)[:, :SIZE]
        add(out, s, amp(db) * (pop + amp(-10.5) * crack))
    return out


# Decay of the room's tail. Each row: frequency in Hz, 60 dB decay time in seconds.
ROOM_DECAY = [(200, 0.596), (700, 0.467), (1800, 0.52), (5000, 0.725), (9000, 0.472), (15000, 0.476)]


def echoes(table_db, tail_db):
    """Reverberation: quick reflections off table and hands, then a tail; long waves reach both ports alike."""
    t = np.arange(SR * 3 // 5) / SR
    taps = rng.choice([-1., 1.], (2, len(t))) * (rng.random((2, len(t))) < 6000 / SR)
    hz, at, z = signal.stft(taps, SR, nperseg=256)
    same = 1 / (1 + (hz / 750) ** 2)[:, None]
    z[1] = same * z[0] + np.sqrt(1 - same ** 2) * z[1]
    early = signal.istft(z, SR, nperseg=256)[1][:, :len(t)] * (t > .0012) * np.exp(-t / 0.00537)
    decay = amp(-60 * at / read(ROOM_DECAY, hz)[:, None])
    tail = signal.istft(z * decay, SR, nperseg=256)[1][:, :len(t)] * (t > .011)
    parts = (table_db, early), (tail_db, tail)
    return sum(amp(db) * part / np.linalg.norm(part, axis=1, keepdims=True) for db, part in parts)


def room(x, count=4):
    """Time-varying convolution: as the hands move, one pattern of reflections passes to the next in a cycle."""
    position = np.arange(N) / SR * 5  # five positions a second
    out = x.copy()
    for k in range(count):
        distance = np.minimum(abs((position - k + 1) % count - 1), 1)
        share = np.cos(np.pi / 2 * distance)
        out += signal.oaconvolve(x * share, echoes(table_db=-2.0, tail_db=-7.5), axes=1)[:, :N]
    return out


# Responses of the two microphone ports. Each row: frequency in Hz, left minus right in dB.
PORT_DIFFERENCE = [(200, 0.5), (700, 0.5), (1400, -2), (2400, 8), (3700, -3), (5500, -10), (7000, -3),
                   (9000, 4.5), (12000, 15.5), (15000, 7)]
# shares that reach the ports without reflections: of the tray's pop and squeaks, and of the scrape
NEAR_SHARE, SCRAPE_NEAR_SHARE = 0.372, 0.0916


def scene():
    """Direct and reflected sound: all the handling, coloured differently by the ports, over the background."""
    close, drag = tray_pop() + squeaks(), scrape()
    direct = NEAR_SHARE * close + SCRAPE_NEAR_SHARE * drag
    others = fidgets() + snaps() + brushes() + groans() + clacks() + box_drop()
    handling = direct + room(close + drag - direct + others)
    lean_db = read(PORT_DIFFERENCE, HZ) / 2
    return np.vstack([colour(handling[0], lean_db), colour(handling[1], -lean_db)]) + background()


EDGE_HZ = 16000  # upper band limit


def record(dry):
    """Linear-phase low-pass: the recorder's slight steady offset and its band limit."""
    offset = .001
    low_pass = signal.firwin(401, EDGE_HZ, window=("kaiser", 9), fs=SR)
    return signal.oaconvolve(dry + offset, low_pass[None], "same")


dry = scene()
out = record(dry)
pcm_store(out)
```